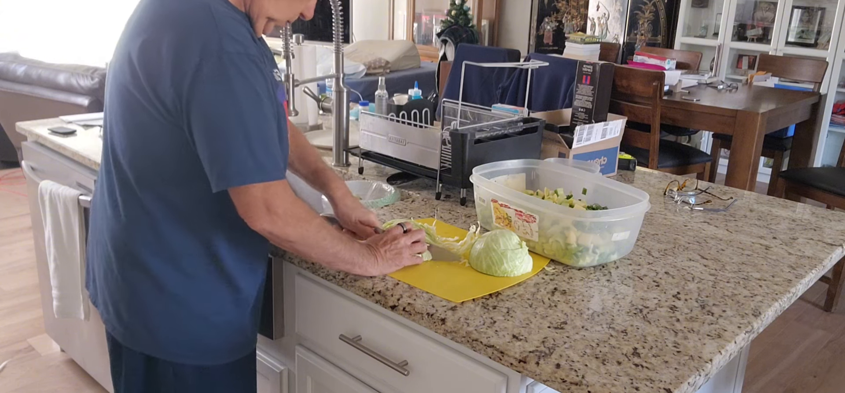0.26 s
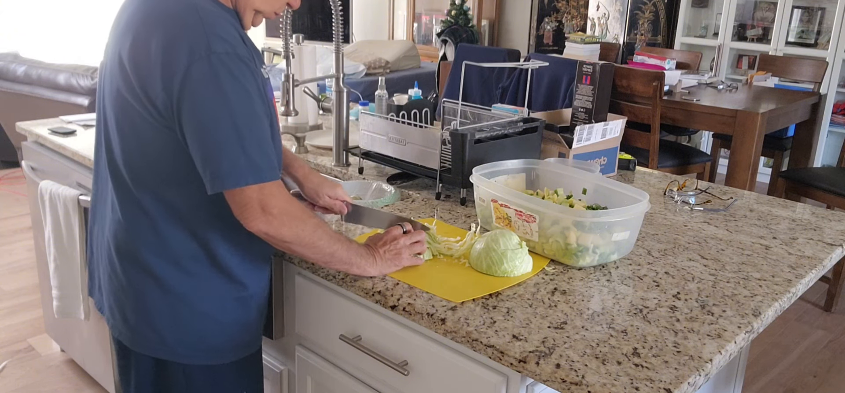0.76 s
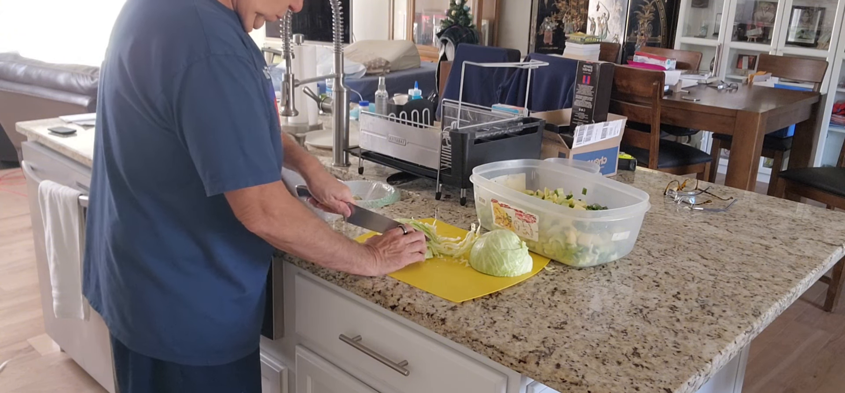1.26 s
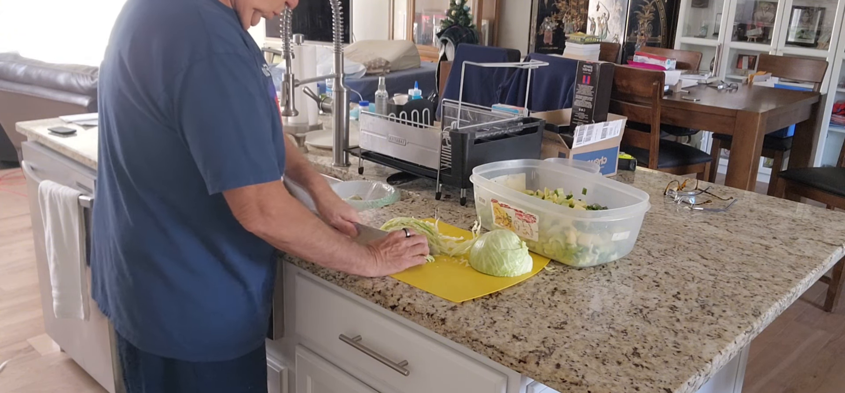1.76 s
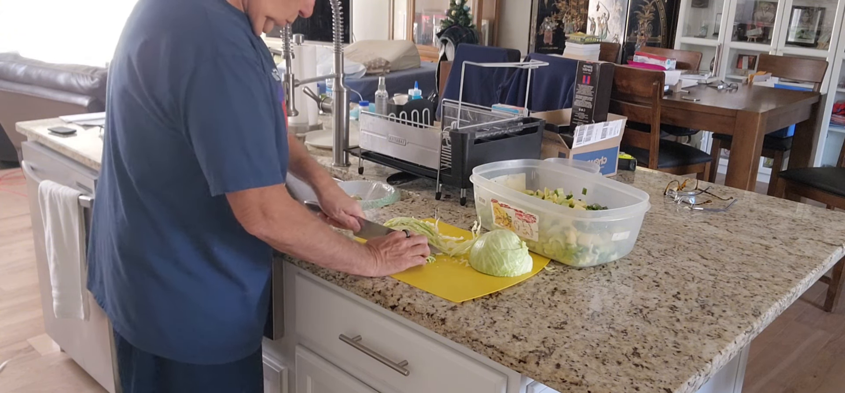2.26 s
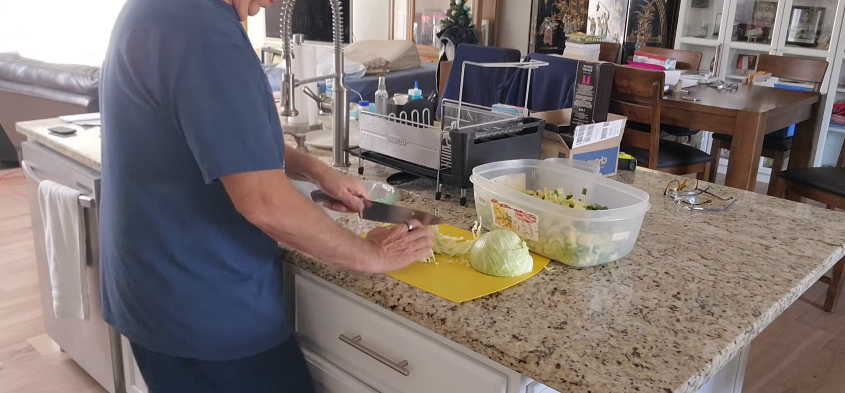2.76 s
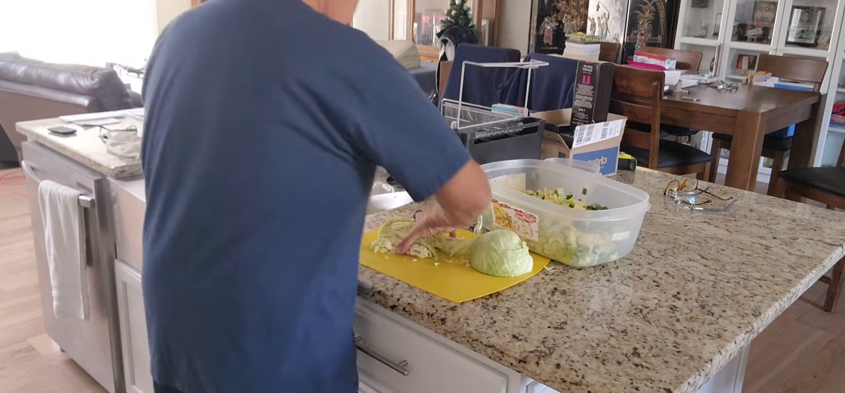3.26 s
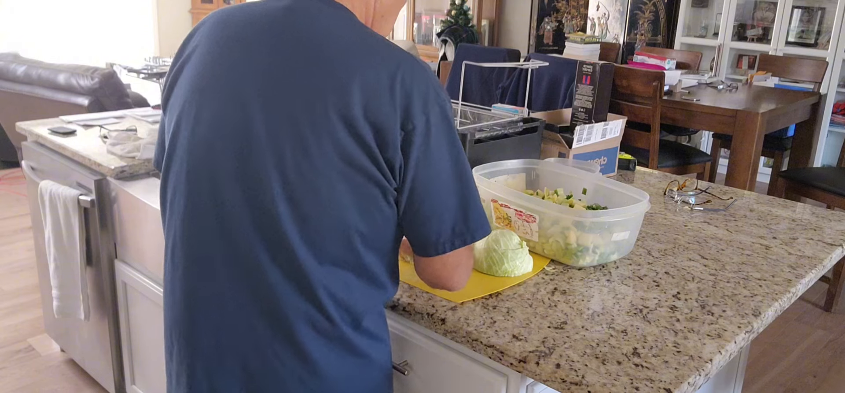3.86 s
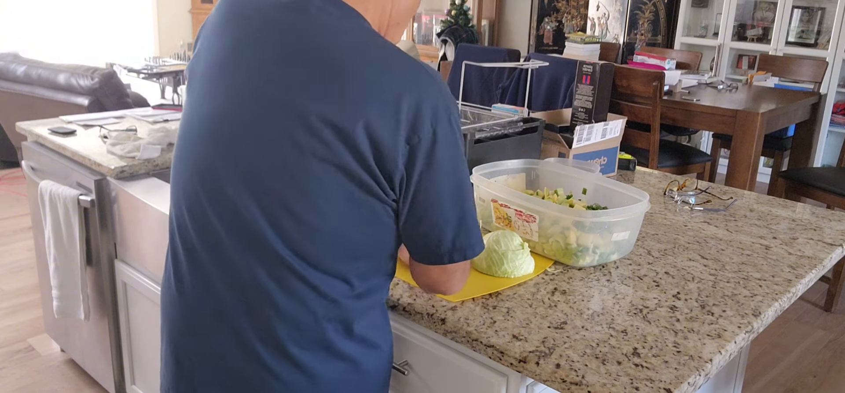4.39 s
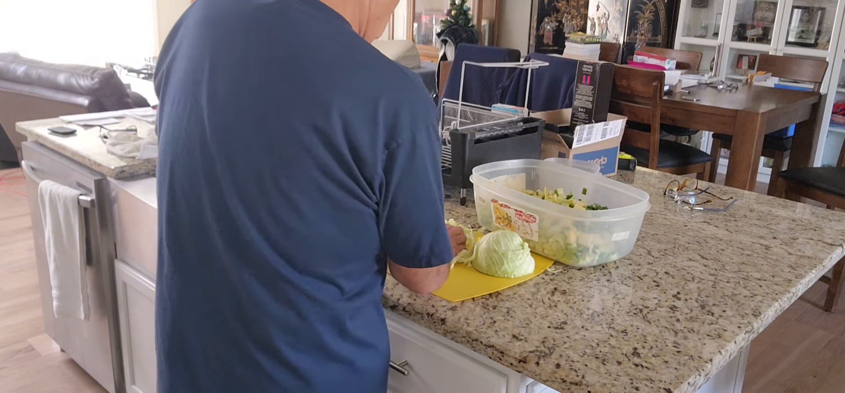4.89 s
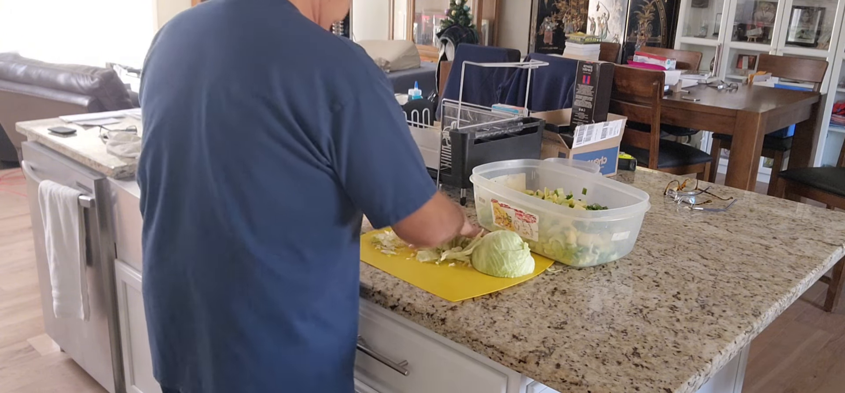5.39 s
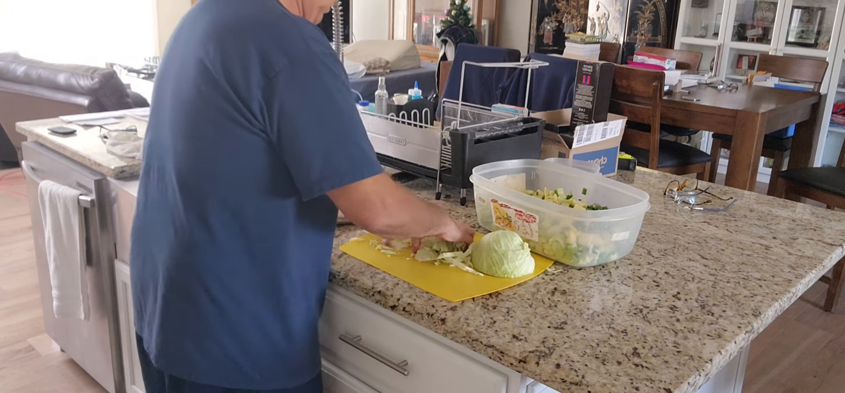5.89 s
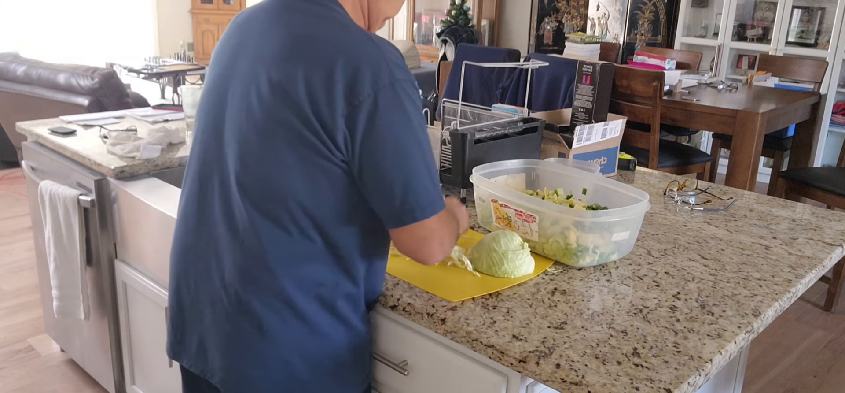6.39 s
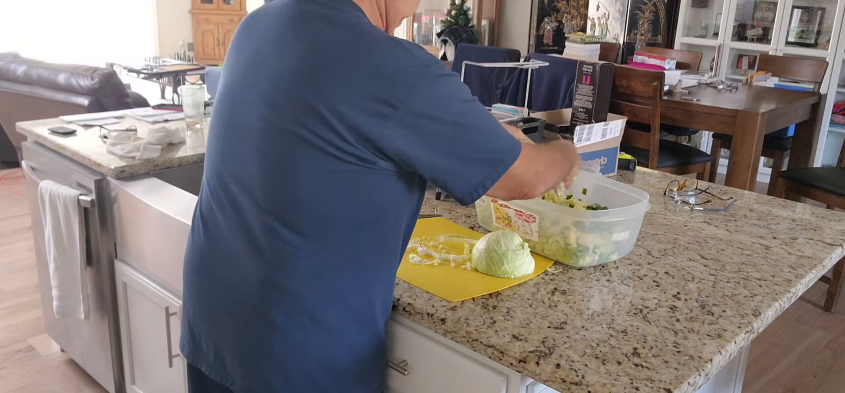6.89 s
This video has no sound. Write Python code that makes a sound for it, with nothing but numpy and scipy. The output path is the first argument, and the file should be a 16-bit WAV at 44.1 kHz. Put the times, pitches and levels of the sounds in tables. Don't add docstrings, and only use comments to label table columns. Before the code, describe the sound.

A reverberant home kitchen, heard in close stereo, with soft room hush, a steady deep refrigerator hum and a faint far engine that sinks in pitch and fades. From about 0.1 s a blade crunches through cabbage, fibres snapping faster until a sharp cracking thump on the plastic mat at 0.26. Light rustles and ticks follow; a second crunch from 1.44 ends in a softer rap at 1.6. Brief wet rustling at 2.3 leads to a quick cut and the hardest, duller chop at 2.45. From 2.9 to 5.2 hands sweep and shove shreds in crisp, squeaky-wet bursts, with knocks at 3.2 and 4.84. At 5.54 the knife tip ticks on stone, the blade rings brightly, and from 5.7 the handle clatters in dwindling bounces to about 6.1. Shreds rustle again around 6.2 to 6.4, a small knock at 6.57, and softer rustling to 7.1.

```python
import sys
import numpy as np
from scipy import signal
from scipy.fft import rfft, irfft, next_fast_len
from scipy.io import wavfile
from scipy.ndimage import uniform_filter1d, map_coordinates

SR = 44100
rng = np.random.default_rng(int(sys.argv[2]) if len(sys.argv) > 2 else 0)


def to_linear_factor(level_db):
    exponent = np.asarray(level_db, float) / 20
    return 10 ** exponent


def file_out(sig):
    cols = np.atleast_2d(sig).T
    lim = np.clip(cols, -1, 1)
    pcm = np.round(lim * 32767).astype(np.int16)
    wavfile.write(sys.argv[1], SR, pcm)


N = 314874

# frequency in Hz, density in dB per Hz.
AIR_SPECTRUM = [(25, -1), (100, 0), (300, -14), (600, -20), (1400, -24.5), (2200, -29.5), (8000, -27.6),
                (16000, -42)]
# frequency in Hz, correlation 0-1.
AIR_LIKENESS = [(60, 0.6), (220, 0.97), (600, 0.2), (2000, 0.12), (6000, 0.048), (15000, 0.18)]
# time in seconds, firing rate in Hz, nearness in dB, load in dB.
ENGINE_COURSE = [
    (0, 38.48, 0, 3),
    (.9, 37.3, 0, -5),
    (1.5, 37.2, 1, -1),
    (2.6, 37.16, -1, -1),
    (3.8, 36.98, 0, 3),
    (4.6, 35.88, -7, 6),
    (5.4, 35.9, -9, 6),
    (7.14, 35.2, -21, 3),
]
# level in dB, share of nearness, share of load.
ENGINE_ORDERS = [(-59, .5, -.5), (-64, .35, .9), (-59.5, 1.1, .05), (-74, .05, -.9), (-79, .5, -.9)]
# time in seconds, seconds to rise 20 dB, seconds to fall 20 dB,
# peak in dB, wet fizz in relative dB.
SWEEPS = [(0, .01, .06, -64, -3), (1.03, .08, .15, -66, -4), (1.294, .05, .06, -72, -9),
          (1.42, .1, .03, -76, 3), (1.86, .12, .1, -59, -9), (2.31, .025, .25, -48, 0),
          (2.95, .1, .08, -45, -10), (3.058, .07, .08, -45, -12), (3.42, .15, .3, -57.5, -5),
          (4.04, .1, .1, -72, 0), (4.134, .04, .35, -48.5, -4), (4.24, .2, .12, -46, -4),
          (4.335, .1, .06, -53, -14), (4.592, .03, .04, -52, 7), (4.656, .06, .12, -45, -22),
          (4.785, .08, .12, -45, -5), (5.242, .04, .04, -73, -7), (6.195, .12, .4, -48.5, -5),
          (6.312, .3, .12, -46.5, -12), (6.812, .07, .4, -52.5, -4), (7.01, .3, .16, -54, -3)]
# time in seconds, rise in seconds, fall in seconds, peak in dB.
SHOVES = [
    (.7, .2, .2, -73),
    (1.77, .1, .1, -72),
    (2.7, .1, .3, -68),
    (3.1, .08, .2, -59),
    (3.26, .04, .3, -63),
    (3.47, .25, .2, -62),
    (3.57, .08, .15, -66),
    (4.66, .1, .15, -62),
    (4.88, .06, .2, -70),
    (5.12, .2, .2, -77),
]
# bite in seconds, through in seconds, bite in dB,
# through in dB, wet fizz in relative dB.
CUTS = [
    (.092, .255, -53, -41, -5),
    (1.44, 1.6, -52, -44.5, -5),
    (2.39, 2.44, -55, -46, -1),
]
# frequency in Hz, width in Hz, level in dB.
SHRED_MODES = [(2180, 300, -5), (3250, 800, -2), (4360, 1000, -1.5), (5660, 1200, -5), (7680, 1000, -11)]
# time in seconds, peak in dB, centre in Hz.
SNAPS = [(.065, -49, 6000), (.091, -35, 6000), (.107, -37, 4000), (.121, -36, 4000), (.125, -36, 7000),
         (.148, -33, 5000), (.18, -23, 3100), (.224, -25, 2200), (.2505, -27, 4000), (.69, -59.5, 5500),
         (1.017, -45, 5000), (1.087, -51, 9000), (1.436, -50, 5000), (1.446, -38, 6000), (1.462, -35, 5000),
         (1.494, -31, 3500), (1.518, -33, 4000), (1.573, -33, 4500), (1.586, -27, 3400), (1.803, -52, 4800),
         (2.284, -41, 6000), (2.298, -38, 7000), (2.311, -29, 3500), (2.756, -49, 5000), (3.223, -33, 4500),
         (3.322, -52, 6000), (3.352, -46, 5000), (4.076, -39, 3150), (4.13, -36, 3600), (4.346, -37, 4500),
         (4.518, -53, 10980), (4.556, -48, 4500), (4.565, -42, 5000), (4.596, -33, 6500),
         (4.657, -34, 5200), (4.667, -35, 4500), (5.033, -47, 5000), (6.569, -47, 3500),
         (6.665, -50.5, 6000), (6.828, -39, 5000)]
# time in seconds, peak in dB, centre in Hz, sharpness Q, t60 in seconds.
BUNCHES = [(.137, -42, 5500, 1, .04), (.195, -33, 2800, 1.5, .05), (.245, -35, 4500, 1, .04),
           (1.465, -41, 5000, 1.3, .07), (1.515, -40, 5000, 1.2, .04), (1.547, -35, 2300, 3, .08),
           (1.59, -34, 3800, 1.2, .04), (2.327, -36, 4800, 1.5, .06), (2.35, -39, 5500, 2.5, .05),
           (2.42, -34, 5000, 1.5, 0.064), (2.88, -43, 2000, 1.7, 0.06), (2.905, -39, 3500, 2, .06),
           (2.944, -34, 4600, 1.5, .06), (2.945, -40, 1900, 3, .05), (3.039, -33, 3760, 2.7, .1),
           (3.07, -38, 1900, 2, .06), (3.35, -44, 3800, 3, .05), (4.135, -39, 4800, 2, .04),
           (4.16, -38, 3300, 3, .07), (4.17, -38, 1700, 3, .06), (4.21, -38, 4600, 2.5, .08),
           (4.245, -36, 4600, 3, .1), (4.31, -42, 2500, 1.5, .06), (4.58, -36, 5800, 1.6, .06),
           (4.585, -41, 11000, 2, .06), (4.63, -40, 5200, 3, .06), (4.648, -33, 5300, 2.5, .06),
           (4.762, -40, 4300, 1.5, .05), (6.26, -39, 4700, 3, .1), (6.29, -39, 3200, 3, .1),
           (6.395, -37, 3500, 1.5, .048), (6.84, -43, 5000, 2.5, .1), (6.93, -44, 3100, 4, .08),
           (7, -43, 3100, 3, .1)]
# time in seconds, peak in dB, centre in Hz, t60 in seconds.
KNOCKS = [(.963, -60, 4400, .05), (1.017, -44, 3390, .018), (1.272, -58, 4150, .04),
          (1.347, -56.5, 5200, .027), (1.493, -42, 1370, .04), (1.585, -33, 3420, .023),
          (2.755, -55, 500, .034), (3.221, -32, 650, .026), (3.222, -32, 1600, .018),
          (3.565, -50, 1500, .03), (4.839, -38, 600, .04), (4.842, -42, 2100, .05),
          (5.482, -46, 5500, .016), (6.567, -38, 1330, .028), (6.568, -45.5, 400, .042),
          (6.918, -51, 600, .03)]
# time in seconds, peak in dB, centre in Hz, sharpness Q, t60 in seconds.
HOLLOW_KNOCKS = [
    (4.84, -34, 950, 5, .07),
    (4.845, -52, 950, 9, .3),
    (6.919, -47, 420, 6, .08),
    (2.31, -47, 230, 6, .1),
    (2.352, -44, 1350, 4, .04),
]
# time in seconds, peak in dB, centre in Hz, sharpness Q, t60 in seconds.
TIP_TOUCHES = [
    (5.535, -36, 6000, .6, .02),
    (5.5405, -26, 12000, 2.5, .03),
    (5.539, -35, 2320, 14, .1),
    (5.54, -26, 7530, 20, .05),
    (5.538, -38, 240, 12, .2),
    (5.538, -44, 1050, 8, .05),
    (5.56, -47, 750, 30, .2),
    (5.701, -44, 1200, .8, .03),
]
# time in seconds, peak in dB, centre in Hz.
CHATTER = [(5.7075, -22, 1000), (5.711, -24, 1500), (5.7155, -25, 600), (5.751, -27, 1500),
           (5.757, -25, 1000), (5.764, -28, 1600), (5.781, -28, 1500), (5.80, -31, 800), (5.82, -32, 600),
           (5.845, -34, 1000), (5.862, -35, 700), (5.884, -33, 1200), (5.905, -36, 900), (5.93, -38, 600),
           (5.965, -42, 1000), (5.995, -41, 500), (6.04, -44, 800), (6.09, -46, 700)]
# time in seconds, peak in dB, thump in relative dB, crack in relative dB, t60 in seconds.
CHOPS = [
    (.2632, -16.5, 3, 5.5, 0.086),
    (1.606, -22, 0, -9, 0.071),
    (2.449, -14.5, -1.5, -19, 0.082),
]
# frequency in Hz, density in dB per Hz.
RAP_SPECTRUM = [(100, -25), (200, -8), (560, -3), (900, -3), (1540, -1), (3820, -19), (4750, -12),
                (15500, -48)]
# frequency in Hz, width in Hz, level in dB.
EDGE_MODES = [(3150, 700, 0), (4830, 600, 5), (7750, 1000, -11.5)]
# frequency in Hz, width in Hz, level in dB.
MAT_MODES = [(240, 74, -4.5), (528, 45, -3), (790, 40, 8), (1020, 140, -11), (1560, 110, -2.5),
             (2310, 140, -0.5), (3250, 200, -5), (4780, 30, -1)]
# time in seconds, where struck (0 tip, 1 spine, 2 heel, 3 flat), ring in dB,
# clack in dB, rattle in dB.
LANDINGS = [
    (5.538, 0, 4, -25.5, -46.5),
    (5.628, 1, 4, -33, -52.5),
    (5.707, 2, 4, -29, -26),
    (5.752, 3, -1.5, -33.5, -28),
    (5.782, 3, -6.5, -30, -35),
    (5.826, 2, -8.5, -41, -34.5),
    (5.879, 3, -15, -39, -37),
    (5.952, 3, -18.5, -45.5, -39),
]
BLADE_HZ = [1529, 1647, 2670, 3416, 4199, 4522, 4821, 5048, 5424, 5771, 6552, 6826, 7176, 4463]
# t60 in seconds, then dB struck at the tip, at the spine, at the heel, flat.
BLADE_MODES = [(.16, -61, -51, -35, -37), (.45, -51, -47, -56, -48), (.7, -53, -55, -64, -64),
               (.6, -43, -35, -39, -40), (.45, -40, -46, -52, -45), (.55, -51, -60, -36, -41),
               (.45, -52, -40, -46, -27.5), (.4, -45, -51, -55, -33), (.4, -37, -54, -46, -49),
               (.45, -50, -43, -54, -58), (.35, -75, -65, -45, -38), (.32, -72, -71, -35, -38),
               (.42, -55, -62, -45, -44), (.3, -43, -43, -60, -66)]
TWIST_HZ = [1990, 2411, 2536, 3065, 3919, 4635, 4729, 6062, 7431, 9151, 12190, 12350, 13417, 15020]
# t60 in seconds, then dB struck at the tip, at the spine, at the heel, flat.
TWIST_MODES = [(.5, -70, -45, -48, -52), (.15, -60, -48, -70, -68), (.3, -52, -52, -70, -72),
               (.2, -47, -60, -68, -66), (.15, -54, -70, -63, -64), (.3, -62, -62, -58, -50),
               (.2, -46, -64, -60, -60), (.25, -55, -57, -72, -70), (.15, -49, -62, -62, -60),
               (.15, -56, -68, -64, -64), (.12, -52, -68, -58, -56), (.12, -64, -64, -58, -58),
               (.1, -60, -70, -57, -60), (.1, -54, -70, -62, -58)]
BEVEL_HZ = [7666, 8140, 8506, 8850, 9851, 10142, 10336, 10497, 11036, 11520, 11854, 12586, 13781]
# dB struck at tip or spine, dB struck at heel or flat.
BEVEL_MODES = [(-61, -51), (-80, -48), (-59, -52), (-58, -50), (-67, -59), (-65, -50), (-56, -44),
               (-60, -52), (-66, -76), (-60, -50), (-39, -52), (-78, -50), (-50, -62)]
# frequency in Hz, density in dB per Hz.
CLACK_SPECTRUM = [(120, -38), (200, -32), (2360, -21), (2730, -34.5), (3100, -4.5), (11200, -14),
                  (12000, 6), (15800, -12)]
# frequency in Hz, width in Hz, level in dB.
HANDLE_MODES = [(138, 30, -7), (250, 33, 4), (420, 50, 3), (548, 55, -3), (660, 50, 2), (1000, 150, -3),
                (1230, 150, -2), (1580, 370, -8)]
# frequency in Hz, t60 in seconds.
KITCHEN_T60 = [(150, 0.57), (800, 0.72), (2000, 0.77), (5000, 0.53), (12000, 0.32)]
# frequency in Hz, correlation 0-1.
ECHO_LIKENESS = [(100, .97), (300, .9), (700, .1), (2000, .12), (6000, .05), (15000, .3)]
# frequency in Hz, gain in dB.
MIC_RESPONSE = [(8200, 1), (9300, -2.5), (15500, -1.5)]


def unit(x):
    return x / np.sqrt(np.mean(x ** 2) + 1e-20)


def along(points, hz):
    f, v = np.transpose(points)
    return np.interp(np.log(hz + 1), np.log(f + 1), v)


def curves(rows):
    s, *cols = np.transpose(rows)
    return [np.interp(np.arange(N) / SR, s, c) for c in cols]


def wobble(rate):
    knots = rng.standard_normal(int(N * rate / SR) + 4)
    return map_coordinates(knots, [np.arange(N) * rate / SR])


def filtered(x, response):
    n = x.shape[-1]
    m = next_fast_len(n + min(n, SR // 2))
    return irfft(rfft(x, m) * response(np.fft.rfftfreq(m, 1 / SR)), m)[..., :n]


def modes(table):
    def response(f):
        total = 0
        for k, (centre, width, db) in enumerate(table):
            resonance = 1j * f * width / (centre * centre - f * f + 1j * f * width)
            total = total + (-1) ** k * to_linear_factor(db) * resonance
        return total
    return response


def burst(response, t60, rise=0.00025):
    t = np.arange(2048 * int(1 + abs(t60) * SR / 2048)) / SR
    shape = to_linear_factor(-60 * t / t60) * (1 - np.exp(-t / rise))
    noise = filtered(rng.standard_normal(len(t)), response)
    return unit(noise * shape) * np.sqrt(np.mean(shape ** 2))


def add(track, s, sound):
    part = track[round(s * SR):][:len(sound)]
    part += sound[:len(part)]


def air():
    def mid_and_side(hz):
        angle = np.arccos(np.clip(along(AIR_LIKENESS, hz), -1, 1)) / 2
        return to_linear_factor(along(AIR_SPECTRUM, hz)) * np.array([np.cos(angle), np.sin(angle)])
    mid, side = filtered(rng.standard_normal((2, N)), mid_and_side)
    return to_linear_factor(-62.8 + 0.27 * wobble(1.22)) * unit(np.array([mid + side, mid - side]))


def drone():
    hz, near_db, load_db = curves(ENGINE_COURSE)
    phase = 2 * np.pi * np.cumsum(hz) / SR
    engine = np.zeros(N)
    for order, (db, near_share, load_share) in zip((2, 3, 4, 6, 8), ENGINE_ORDERS):
        level_db = db + near_share * near_db + load_share * load_db + wobble(3.03)
        engine += to_linear_factor(level_db) * np.sin(order * phase)
    hum_hz, hum_db = 56.7, -44
    hum = to_linear_factor(hum_db + 0.4 * wobble(2.69)) * np.sin(2 * np.pi * hum_hz * np.arange(N) / SR + 1.3)
    return np.sqrt(2) * (hum + engine)


def crackle(table, spiky_db, clump_db, patchy_db):
    size_db = spiky_db * np.minimum(rng.exponential(size=N), 6)
    grains = rng.standard_normal(N) * to_linear_factor(size_db + clump_db * wobble(70))
    z = signal.stft(grains, nperseg=256)[2]
    field = uniform_filter1d(rng.standard_normal(z.shape), size=4, axis=0)
    field = uniform_filter1d(field, size=4, axis=1)
    patched = signal.istft(z * to_linear_factor(patchy_db * unit(field)), nperseg=256)[1][:N]
    return unit(filtered(patched, modes(table)))


def leaves():
    t = np.arange(0, N / SR + .002, .001)

    def tent(start, end, rise, fall):
        return -20 * (np.maximum(start - t, 0) / rise + np.maximum(t - end, 0) / fall)

    def level(rows_db):
        return np.interp(np.arange(N) / SR, t, np.sqrt(sum(to_linear_factor(2 * db) for db in rows_db)))

    # level in dB, then wet fizz and ribs relative to it
    strokes = [(db + tent(s, s, rise, fall), wet_db, -6.5) for s, rise, fall, db, wet_db in SWEEPS]
    shoves = [(db + tent(s, s, rise, fall), -12, 4) for s, rise, fall, db in SHOVES]
    strokes += shoves
    for bite, through, bite_db, through_db, wet_db in CUTS:
        depth = np.clip((t - bite) / (through - bite), 0, 1)
        cut_db = bite_db + (through_db - bite_db) * depth + tent(bite, through, rise=.012, fall=.03)
        ribs_db = -12 + 13 * depth ** 1.3
        strokes.append((cut_db, wet_db, ribs_db))

    force = level(db for db, wet, ribs in strokes)
    crunch = force * crackle(SHRED_MODES, spiky_db=5.5, clump_db=3, patchy_db=4)
    body = level(db + ribs for db, wet, ribs in strokes)
    body = body * crackle([(1303, 520, -2), (2000, 660, 1)], spiky_db=3.5, clump_db=3, patchy_db=3)
    fizz = to_linear_factor(2.5) * level(db + wet for db, wet, ribs in strokes)
    fizz = fizz * crackle([(8500, 7500, 3.5)], spiky_db=5, clump_db=3, patchy_db=-1)
    drag = level(db - 1 for db, wet, ribs in shoves)
    rumble = to_linear_factor(-67) * (force / to_linear_factor(-55)) ** .8 + drag
    rumble = rumble * crackle([(270, 130, 5.5), (800, 500, -1)], spiky_db=2.5, clump_db=4, patchy_db=2.5)
    return to_linear_factor(-3.5) * (crunch + body + fizz + rumble)


def taps():
    out = np.zeros(N)
    quick = [(s, db, hz, 1.1, .008) for s, db, hz in SNAPS]
    quick += [(s, db, hz, 2.2, t60) for s, db, hz, t60 in KNOCKS]
    quick += list(TIP_TOUCHES) + list(HOLLOW_KNOCKS)
    quick += [(s, db, hz, 1.6, .025) for s, db, hz in CHATTER]
    for table, lift_db, rise in ((quick, -2.5, .0004), (BUNCHES, -.5, .012)):
        for s, db, hz, q, t60 in table:
            resonance = modes([(hz, 1.5 * hz / q, 0)])
            puff = burst(lambda f: resonance(f) ** 2, t60, rise)
            add(out, s, to_linear_factor(db + lift_db) * puff)
    return out


def chops():
    out = np.zeros(N)
    push = np.exp(-np.arange(SR // 2) / SR / 4e-5)
    for s, db, thump_db, crack_db, t60 in CHOPS:
        rap = burst(lambda f: to_linear_factor(along(RAP_SPECTRUM, f)), t60, rise=0.0035)
        crack = burst(modes(EDGE_MODES), t60 * 0.76, rise=0.0016)
        ring = filtered(push, lambda f: modes(MAT_MODES)(f) * to_linear_factor(thump_db / (1 + (f / 650) ** 4)))
        add(out, s, to_linear_factor(db - 8.5) * rap)
        add(out, s, to_linear_factor(db + crack_db - 11) * crack)
        add(out, s, to_linear_factor(db + 20.5) * ring)
    return out


def knife():
    out, t = np.zeros(N), np.arange(SR // 2) / SR
    hz = np.array(list(BLADE_HZ) + list(TWIST_HZ) + list(BEVEL_HZ))[:, None]
    bevel = []
    for f, (front_db, rear_db) in zip(BEVEL_HZ, BEVEL_MODES):
        bevel.append((2500 / f, front_db, front_db - 8, rear_db, rear_db))
    t60, *struck_db = np.transpose(list(BLADE_MODES) + list(TWIST_MODES) + bevel)[:, :, None]
    faint_hz = rng.uniform(3000, 15600, size=(110, 1))
    early = t[:SR // 4]
    for s, where, ring_db, clack_db, rattle_db in LANDINGS:
        beat_hz = rng.uniform(11.3, 32.4, size=hz.shape)
        beat = 1 + 0.45 * np.sin(2 * np.pi * (beat_hz * t + rng.random(hz.shape)))
        decay = to_linear_factor(struck_db[round(where)] - 60 * t / (0.92 * t60))
        ring = np.sum(decay * beat * np.sin(2 * np.pi * hz * (t + s)), axis=0)
        faint_db = rng.normal(0, 5.2, size=faint_hz.shape) - faint_hz / 3000 - 60 * early / .28
        crowd = np.sum(to_linear_factor(faint_db) * np.sin(2 * np.pi * faint_hz * early + 6 * faint_hz), axis=0)
        crowd = np.pad(crowd, (0, len(t) - len(crowd)))
        steel = to_linear_factor(ring_db + .2) * ring + to_linear_factor(clack_db - 24) * crowd
        clack = burst(lambda f: to_linear_factor(along(CLACK_SPECTRUM, f)), t60=0.06, rise=.0015)
        rattle = burst(modes(HANDLE_MODES), t60=0.11, rise=0.0025)
        add(out, s, steel * (1 - np.exp(-t / 0.0012)))
        add(out, s, to_linear_factor(clack_db + 1) * clack)
        add(out, s, to_linear_factor(rattle_db + 6.5) * rattle)
    return out


def placed(x, pan_db, lead_s):
    side = np.array([[.5], [-.5]])
    return to_linear_factor(side * pan_db) * filtered(x, lambda f: np.exp(2j * np.pi * f * side * lead_s))


def walls(x):
    span_s, nearest_db = .022, -7
    delay = span_s * (.06 + rng.random((10, 1)) ** 1.5) + rng.normal(0, 0.000246, size=(10, 2))
    gain = rng.choice([-1, 1], size=(10, 1)) * to_linear_factor(nearest_db - 9 * delay / span_s)

    def response(f):
        return np.sum(gain[..., None] * np.exp(-2j * np.pi * f * delay[..., None]), axis=0)
    return filtered(x, response)


def kitchen(x):
    out, step = np.zeros((2, N + SR * 2)), SR // 2
    for start in range(0, N, step):
        hz, t, z = signal.stft(rng.standard_normal((2, SR)), SR, nperseg=256)
        shared = np.clip(along(ECHO_LIKENESS, hz), 0, 1)[:, None]
        z = np.array([z[0], shared * z[0] + np.sqrt(1 - shared ** 2) * z[1]])
        decay = to_linear_factor(-60 * t / along(KITCHEN_T60, hz)[:, None])
        tail = signal.istft(z * decay, SR, nperseg=256)[1][:, :SR]
        tail = tail / np.linalg.norm(tail[0])
        wet = signal.fftconvolve(x[None, start:start + step], tail, axes=1)
        out[:, start + 130:][:, :wet.shape[1]] += wet
    return out[:, :N]


def scene():
    board, steel = leaves() + taps() + chops(), knife()
    direct = placed(board, pan_db=.6, lead_s=5e-5) + placed(steel, pan_db=-.3, lead_s=-1.5e-5)
    room = walls(board + to_linear_factor(-6) * steel) + to_linear_factor(-3) * kitchen(board + to_linear_factor(1.5) * steel)
    hum = placed(drone(), pan_db=1, lead_s=3e-5)
    return to_linear_factor(-3.5) * (direct + room) + hum + air()


def top_cut(x):
    return signal.sosfilt(signal.butter(12, 16490, fs=SR, output="sos"), x)


def record(dry):
    heard = filtered(dry, lambda f: to_linear_factor(along(MIC_RESPONSE, f)) * (f < 15800))
    return top_cut(heard)


dry = scene()
out = record(dry)
file_out(out)
```